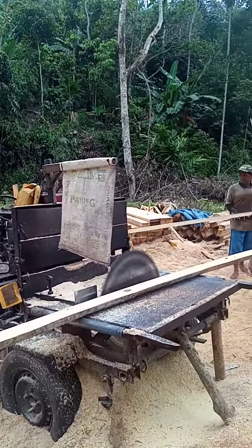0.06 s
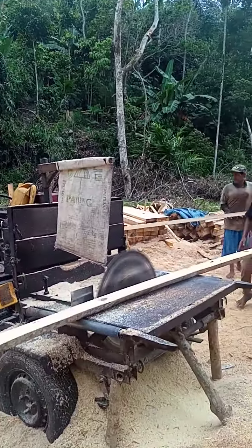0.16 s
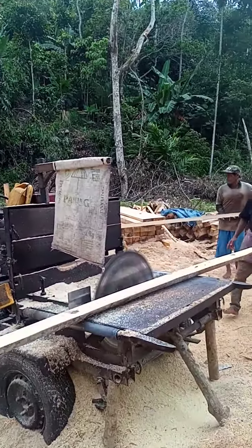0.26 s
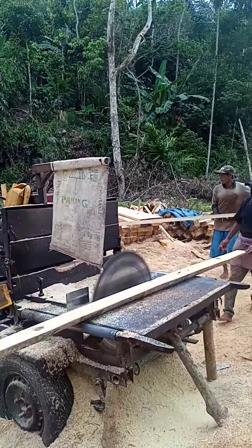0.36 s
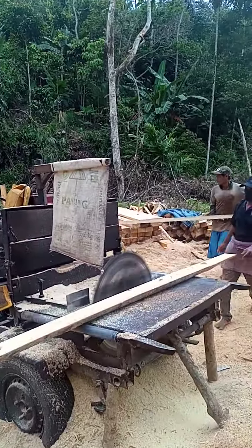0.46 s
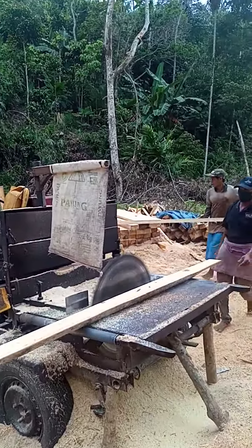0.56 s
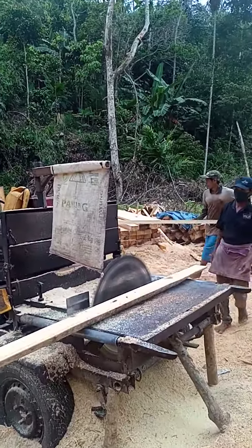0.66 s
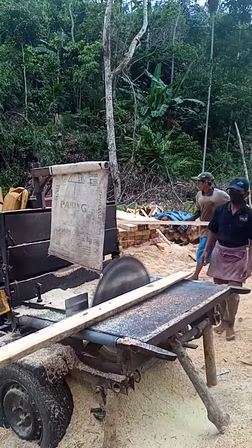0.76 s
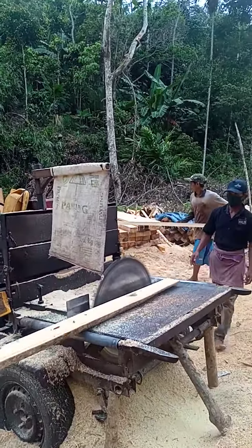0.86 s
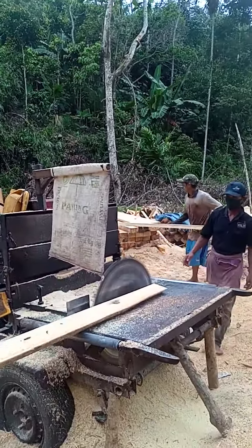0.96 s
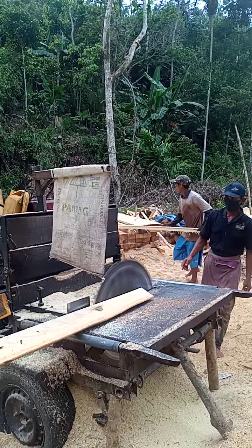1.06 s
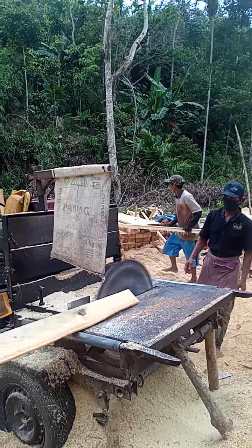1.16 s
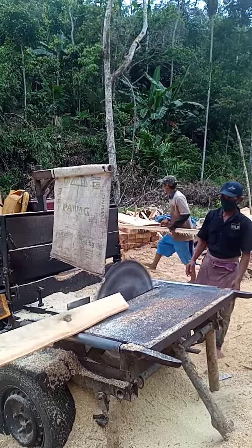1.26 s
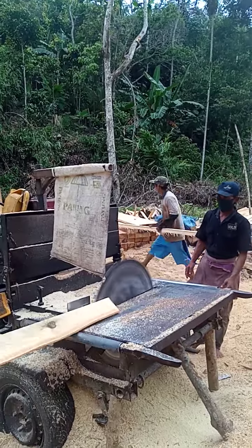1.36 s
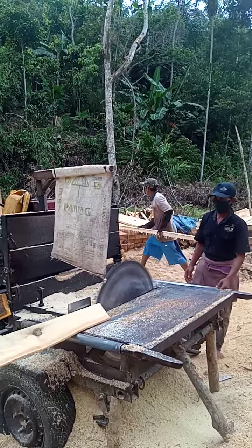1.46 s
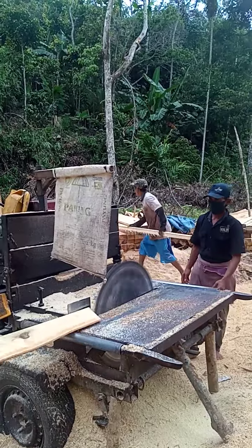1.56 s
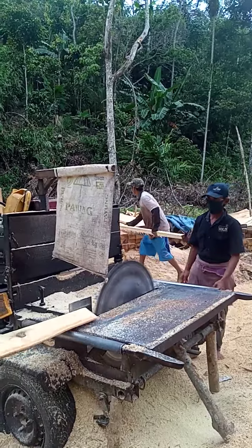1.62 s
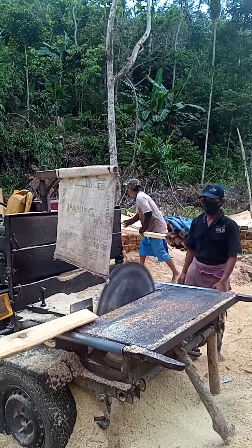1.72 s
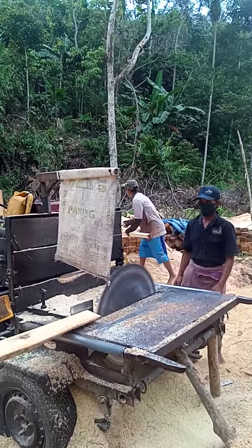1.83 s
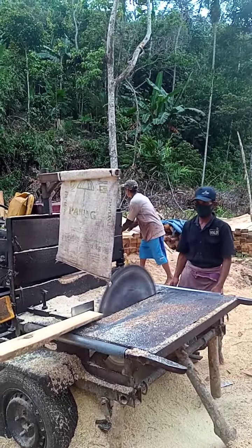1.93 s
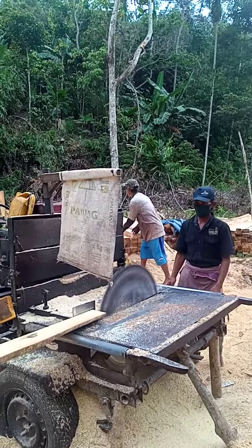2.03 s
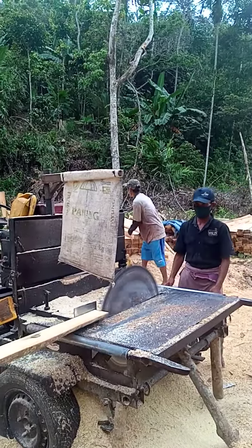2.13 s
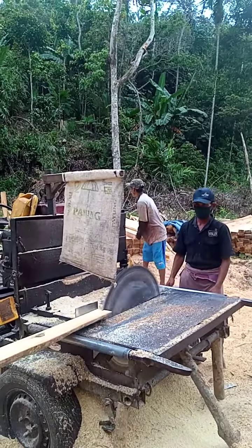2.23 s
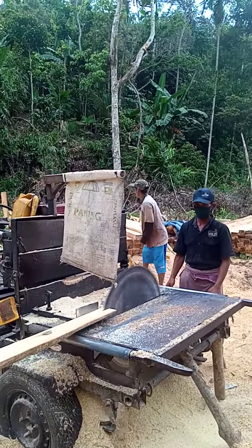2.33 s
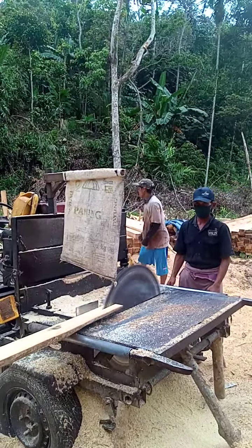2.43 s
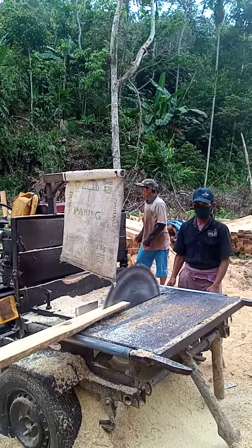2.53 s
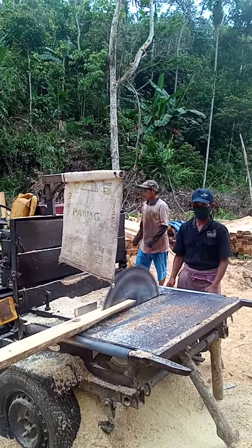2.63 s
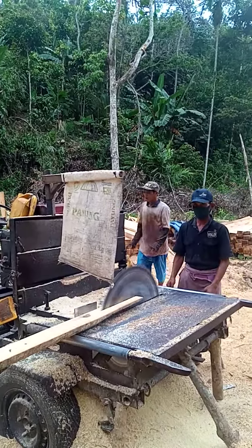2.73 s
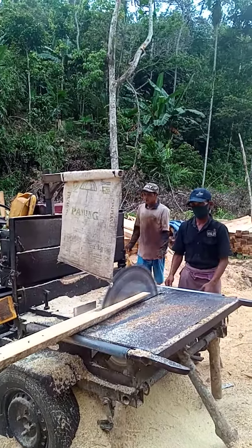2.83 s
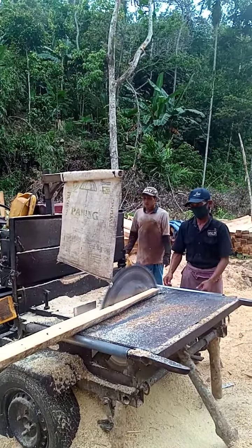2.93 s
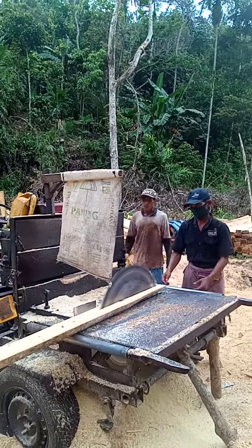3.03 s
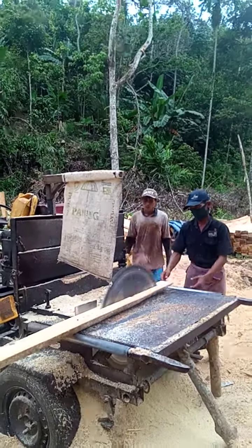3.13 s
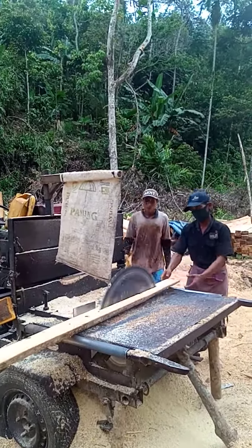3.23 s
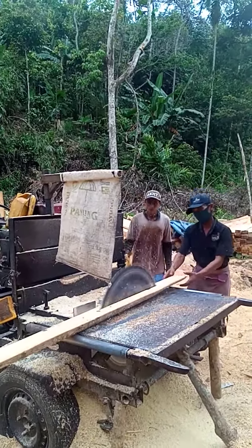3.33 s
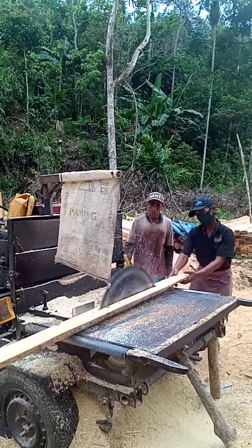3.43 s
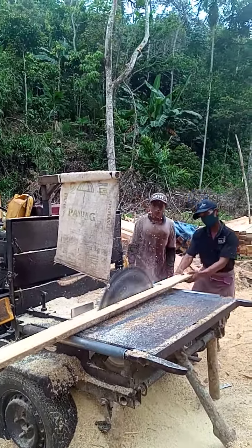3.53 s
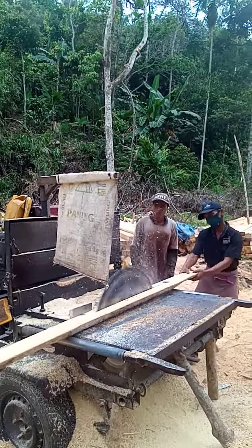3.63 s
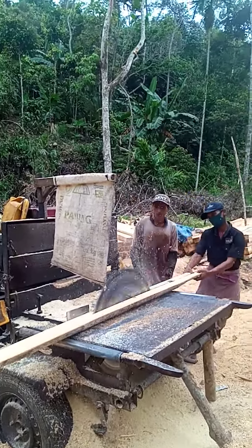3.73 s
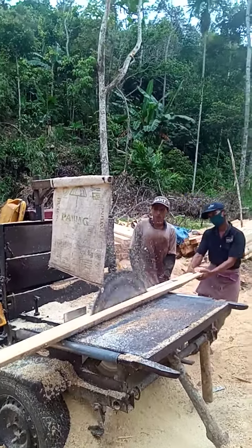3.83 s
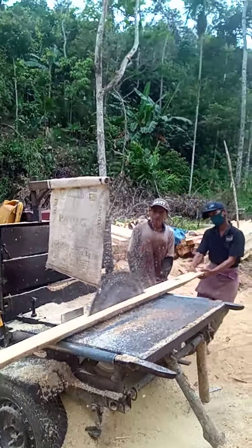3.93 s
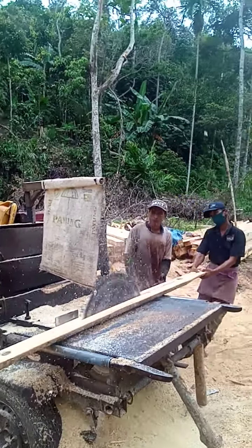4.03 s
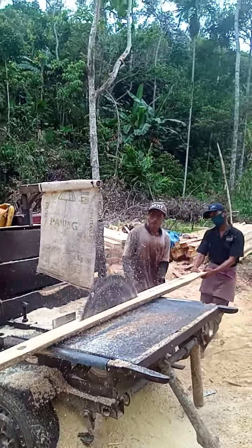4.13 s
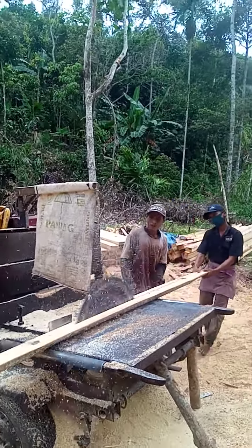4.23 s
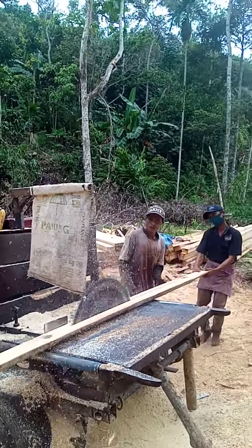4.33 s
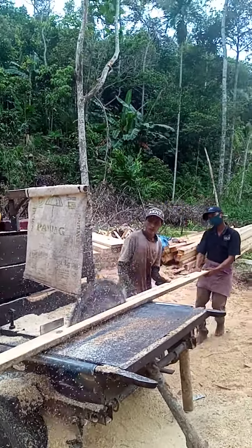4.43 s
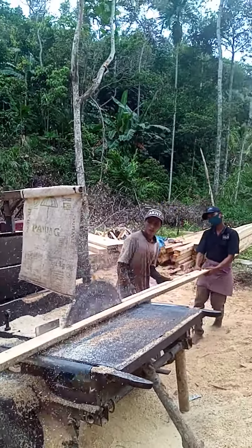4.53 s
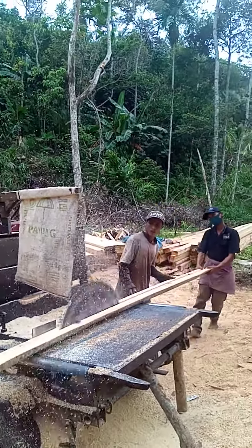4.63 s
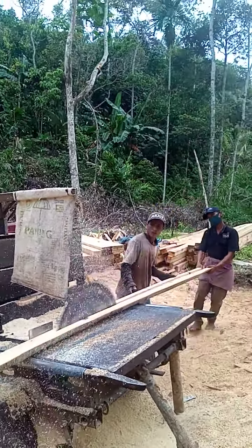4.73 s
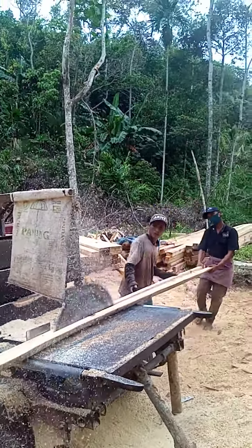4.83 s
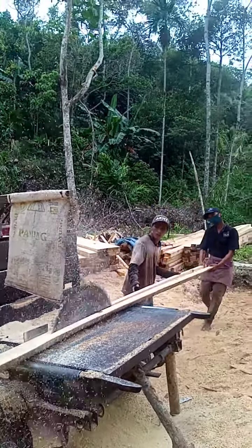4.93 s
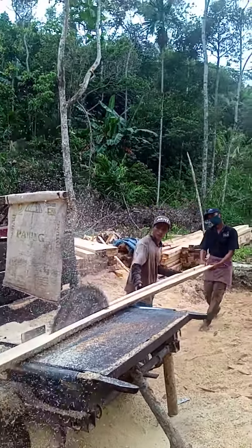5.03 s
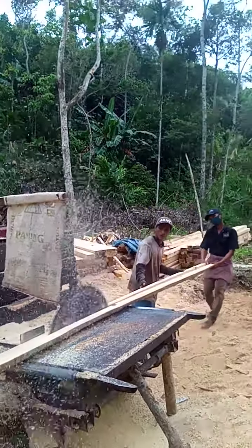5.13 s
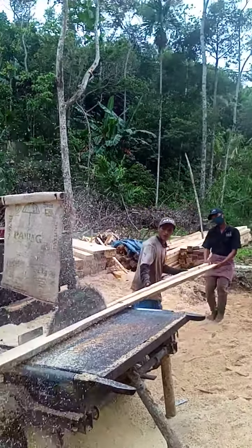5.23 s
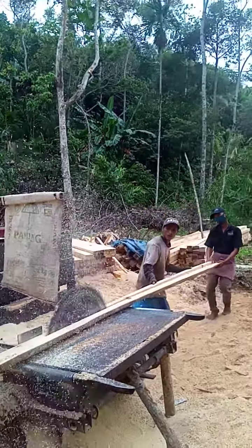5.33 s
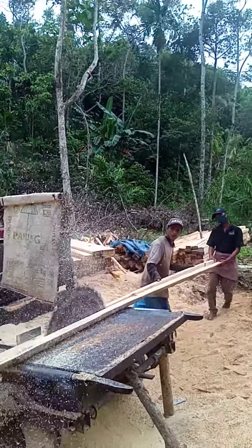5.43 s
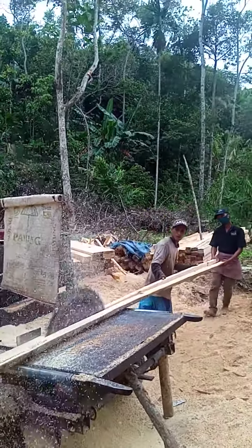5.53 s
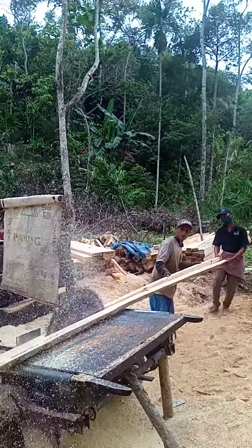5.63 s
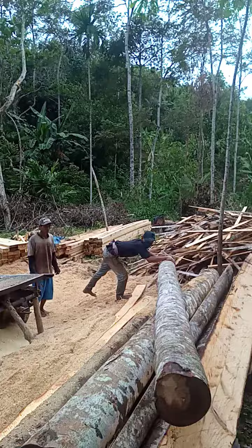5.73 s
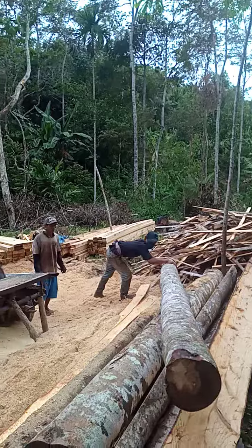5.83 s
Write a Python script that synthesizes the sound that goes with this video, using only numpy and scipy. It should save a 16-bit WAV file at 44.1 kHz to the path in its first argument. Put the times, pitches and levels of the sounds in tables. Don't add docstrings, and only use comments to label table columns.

```python
import sys
import numpy as np
from scipy import signal
from scipy.fft import rfft, irfft
from scipy.io import wavfile
from scipy.ndimage import uniform_filter1d, minimum_filter1d

SR = 44100
rng = np.random.default_rng(int(sys.argv[2]) if len(sys.argv) > 2 else 0)


def materialize(psi):
    bounded = np.clip(np.atleast_2d(psi).T, -1, 1)
    quanta = np.round(bounded * 32767).astype(np.int16)
    wavfile.write(sys.argv[1], SR, quanta)


def magnitude_from_level(level_db):
    exponent = np.asarray(level_db, float) / 20
    return 10 ** exponent


N = 258855

DROPOUT_S, RETURN_S = 5.531, 5.644
FAR_S = 5.685
IDLE_HZ = 12.95


def colour(x, points):
    hz, db = np.transpose(points)
    f = np.maximum(np.fft.rfftfreq(N, 1 / SR), 1)
    gain_db = np.interp(np.log(f), np.log(hz), db, left=-90, right=-90)
    y = irfft(rfft(x) * magnitude_from_level(gain_db), N)
    return y / y.std()


def walk(rate):
    k = int(SR / rate)
    held = np.repeat(rng.standard_normal(N // k + 1), k)
    return 1.1 * uniform_filter1d(uniform_filter1d(held, k), k)[:N]


def curves(rows):
    s, *columns = np.transpose(rows)
    return [np.interp(np.arange(N) / SR, s, c) for c in columns]


def bumps(rows):
    s, half_s, *db = np.transpose(rows)
    t = np.arange(0, N + 64, 64) / SR
    humps = np.exp(-((t - s[:, None]) / half_s[:, None]) ** 2)
    return [np.interp(np.arange(N) / SR, t, d @ humps) for d in db]


def add(out, s, sound):
    i = int(s * SR)
    if 0 <= i < N:
        out[i:i + len(sound)] += sound[:N - i]


def burst(hz, length_s, glide=0., lean=0.79):
    u = np.linspace(0, 1, int(length_s * SR))
    hump = np.sin(np.pi * u ** lean) ** 2
    turns = hz * length_s * (u - .5) * (1 + glide * (.5 - u))
    return hump * np.sin(2 * np.pi * turns)


def ticks(spread_db, size):
    loud = np.minimum(rng.exponential(size=N // size + 1), 4)
    grains = uniform_filter1d(loud.repeat(size)[:N], size // 2)
    return rng.standard_normal(N) * magnitude_from_level(spread_db * grains)


def forest(far):
    # f/Hz, level/dB
    leaf_tone = [(300, -11), (1000, -7), (3000, 7), (4200, 11), (6000, -13), (10000, -10), (15500, -24)]
    # f/Hz, level/dB
    insect_tone = [(10500, -20), (12500, 1), (15800, 1)]
    leaves = magnitude_from_level(-73) * colour(rng.standard_normal(N), leaf_tone)
    insects = magnitude_from_level(-86 - 6 * far) * colour(rng.standard_normal(N), insect_tone)
    return leaves + insects


def wind(level_db):
    # f/Hz, level/dB
    wind_tone = [(20, -34), (40, -4.5), (70, 0.5), (110, -1), (170, -14.5), (260, -5), (400, -11),
                 (700, -28)]
    gusty = rng.standard_normal(N) * magnitude_from_level(2.1 * walk(14))
    return colour(gusty, wind_tone) * magnitude_from_level(level_db)


def thumps():
    # t/s of the peak, peak level/dB, f/Hz, turns
    blows = [(0.077, -46, 112, 2), (0.237, -27.5, 99, 1.9), (0.532, -32.5, 93.6, 2.2),
             (.774, -44, 122, 2.7), (0.791, -39.5, 80.5, 2), (.972, -41.5, 120, 2), (2.545, -38, 90, 1.25),
             (3.8, -44, 100, 2.4), (3.822, -43, 60, 2), (3.856, -32.5, 102, 1.4), (3.93, -43, 100, 2),
             (3.97, -42, 190, 2.3), (4.009, -35, 233, 1.9), (4.038, -41, 89, 2.9), (4.064, -29.5, 124, 1.5),
             (4.394, -47, 90, 1.7), (4.42, -49, 95, 1.5), (4.5, -37.5, 102, 1.6), (4.523, -34.5, 230, 0.92),
             (4.748, -39, 120, 2.3), (4.875, -44, 65, 1.9), (5.055, -28, 121, 1.1), (5.132, -38.5, 74, 1.8),
             (5.174, -38.5, 100, 1.8), (5.197, -43, 90, 1.8), (5.41, -40, 95, 2.2), (5.43, -39, 85, 2.8),
             (5.452, -35, 94.5, 0.92), (5.689, -45, 99, 1.9)]
    out = np.zeros(N)
    for s, db, hz, turns in blows:
        length_s = (turns + 1) / hz
        add(out, s - length_s / 3, magnitude_from_level(db) * burst(hz, length_s, glide=.4, lean=.58))
    return out


def clatter(phase):
    # f/Hz, level/dB
    tin_tone = [(240, -35), (400, -16.5), (900, -12.5), (1190, -8.5), (1470, -16), (1650, -7), (2250, -5.5),
                (2500, 0), (2780, 2.5), (3100, -23.5), (3620, -27.5), (5000, -50)]
    # f/Hz, level/dB
    valve_tone = [(3300, -17), (3700, -1), (4900, -26), (5700, 0), (6500, -14), (6800, -11), (8500, -7),
                  (10000, 4.5), (11000, -8.5), (12500, -24), (15600, -29)]
    swell_db = np.exp(-((phase % 1 - .52) / 0.1) ** 2) + 0.24 * np.cos(4 * np.pi * phase)
    tin = colour(ticks(1.95, size=120) * magnitude_from_level(2.4 * swell_db + 0.61 * walk(40)), tin_tone)
    valves = colour(ticks(1.6, size=100) * magnitude_from_level(5.1 * swell_db + 2.4 * walk(27)), valve_tone)
    return tin + magnitude_from_level(-20.5) * valves


def engine(firings, period):
    # place in cycle 0-1, f/Hz, rise/s, t60/s, level/dB, level scatter/dB
    knocks = [(0.7, 2040, 0.00072, 0.0091, -33.5, 4.5), (0.2, 1300, .001, 0.019, -51, 4.5),
              (.46, 726, 0.023, 0.12, -39.5, 0.5), (0.4, 755, 0.0049, 0.05, -41, -3),
              (0.84, 1100, 0.0071, 0.038, -67, 11), (.62, 289, 0.0019, 0.034, -47, 1),
              (0.3, 140, 0.012, 0.028, -50, -4)]
    pop_hz, pop_s, pop_db = 284, .0145, -38.5
    wall_s, wall_db = .0228, -4
    load_lag = 0.0887
    exhaust, casing, t = np.zeros(N), np.zeros(N), np.arange(SR // 8) / SR
    chance = rng.standard_normal((len(firings), 3 + 2 * len(knocks)))
    for s, p, c in zip(firings, period, chance):
        hz = pop_hz * (1 + 0.0036 * c[0])
        pop = burst(hz, pop_s, glide=0.033, lean=0.9)
        echo = burst(0.92 * hz, 1.075 * pop_s, glide=0.042, lean=0.83)
        start_s = s - pop_s / 2
        add(exhaust, start_s, pop * magnitude_from_level(pop_db + 0.84 * c[1]))
        add(exhaust, start_s + wall_s, -echo * magnitude_from_level(pop_db + wall_db + 0.72 * c[2]))
        late = load_lag * (IDLE_HZ - 1 / p)
        for (place, hz, rise, t60, db, scatter_db), a, b in zip(knocks, c[3::2], c[4::2]):
            envelope = (1 - np.exp(-t / rise)) * magnitude_from_level(-60 * t / t60)
            ring = envelope * np.sin(2 * np.pi * hz * (1 + 0.0045 * b) * t)
            add(casing, s + (place + late + 0.01157 * b) * p, ring * magnitude_from_level(db + scatter_db * a))
    return exhaust, casing


def feed():
    # t/s, blade howl level/dB
    bite_track = [(1.86, -45), (2.05, -40.5), (2.4, -39), (2.62, -37), (2.78, -34.5), (3.06, -35),
                  (3.65, -31.5), (4.5, -31), (5.68, -32)]
    # t/s, half length/s, howl rise/dB, hiss rise/dB
    grazes = [(.55, 0.22, 1.5, 6), (.545, 0.014, 6, -2), (.76, .02, -3, 4.5), (1.3, .04, 1.5, 9),
              (1.34, 0.024, 6, 11), (1.39, 0.063, 5.5, 0), (1.43, 0.03, 1, 13), (1.69, .025, -2, 4),
              (1.82, .015, -18, -2)]
    # t/s, half length/s, howl rise/dB
    knots = [(2.2, .06, -1), (2.32, 0.042, 2.5), (2.43, 0.012, 4.5), (2.455, .012, -1), (2.48, .012, 1.5),
             (2.52, .02, -1), (2.575, .015, 0.5), (2.78, .04, 1.5), (3.735, 0.018, 1.5),
             (3.755, 0.013, -0.5), (3.785, .012, 2), (4.23, .015, 1), (4.4, 0.0065, -3.5),
             (4.425, 0.019, 2), (4.51, 0.011, -2.5), (5.36, 0.036, -1.5), (5.4, .015, 3.5),
             (5.661, 0.0042, -8), (5.67, 0.0044, 6.5)]
    free_howl_db, free_hiss_db = -49.5, -70
    full_howl_db, full_hiss_db = -30.5, -41.5
    entry_s, entry_rise_s = 1.842, 0.033
    dust_top_s, dust_hold_s, dust_fade_db_s = 2.2, 0.8, 4
    t = np.arange(N) / SR
    inside = np.clip((t - entry_s) / entry_rise_s, 0, 1)
    bite_db, knot_db = curves(bite_track)[0], bumps(knots)[0]
    graze_howl_db, graze_hiss_db = bumps(grazes)
    scrap_db = -1.5 * (t > RETURN_S)
    cut_howl_db = bite_db + knot_db + scrap_db
    cut_hiss_db = full_hiss_db + 0.49 * (bite_db - full_howl_db) + 0.56 * knot_db
    howl_db = (1 - inside) * (free_howl_db + graze_howl_db) + inside * cut_howl_db
    hiss_db = (1 - inside) * (free_hiss_db + graze_hiss_db) + inside * cut_hiss_db
    thrown_db = np.interp(t, [entry_s, dust_top_s], [-2, 5])
    settled_db = dust_fade_db_s * np.clip(t - dust_top_s - dust_hold_s, 0, 1.6)
    dust_db = np.where(t < entry_s, -0.5, thrown_db - settled_db)
    return howl_db, hiss_db, dust_db


def saw(speed, howl_db, hiss_db, dust_db):
    # f/Hz, level/dB
    howl_tone = [(240, -49), (400, -27), (500, -22), (606, -29.5), (881, -23), (1040, -22.5), (1390, -29.5),
                 (2190, -10), (2600, 1), (3220, -6), (3710, -30), (4500, -30), (5850, -73)]
    # f/Hz, level/dB
    hiss_tone = [(3000, -46), (3980, -10), (4540, -30), (5100, -4.5), (6000, 2), (6450, 1.5), (6850, -11.5),
                 (7200, -10), (9280, -5), (10300, 1.5), (11000, -5), (12900, -30.5), (15000, -30),
                 (15700, -33)]
    # f/Hz, width/Hz, level/dB
    plate = [(1060, 33, -26.5), (1217, 44, -29.5), (1506, 44, -25.5), (1789, 27, -20.5), (2017, 41, -17.5),
             (2346, 41, -14.5), (2494, 32, -13), (2583, 20.5, -7), (2730, 42, -8), (2878, 52, -11.5),
             (3092, 27, -15.5), (3970, 27, -31.5), (4820, 63, -26), (5260, 31, -29), (5620, 49, -20.5),
             (5840, 12, -34), (6085, 46, -17.5), (6580, 68, -36.5), (6990, 40, -28), (7440, 77, -23.5),
             (7570, 20, -32), (8270, 40, -24), (8500, 35, -37), (8820, 38, -27.5), (9130, 76, -27.5),
             (10230, 52, -25)]
    teeth_per_cycle = 40.8
    tooth = np.cumsum(teeth_per_cycle * speed * (1 + .024 * walk(25))) / SR
    strikes = np.diff(np.floor(tooth), prepend=0) * magnitude_from_level(5.8 * rng.standard_normal(N))
    grain = magnitude_from_level(0.41 * walk(45))
    bite = (strikes / strikes.std() + 2.13 * rng.standard_normal(N)) * grain
    out = magnitude_from_level(howl_db - 2.0) * colour(bite, howl_tone)
    graze = ticks(3.2, size=90)
    light = np.clip((-53.5 - hiss_db) / 8, 0, 1)
    rub = light * graze / graze.std() + np.sqrt(1 - light ** 2) * rng.standard_normal(N)
    hiss = colour(rub * grain * magnitude_from_level(0.76 * walk(24.66)), hiss_tone)
    dust_band = signal.butter(3, [11300, 13600], "band", fs=SR, output="sos")
    dust = signal.sosfiltfilt(dust_band, hiss)
    out += magnitude_from_level(hiss_db) * (hiss + (magnitude_from_level(dust_db) - 1) * dust)
    low_db = howl_db + 0.36 * (howl_db + 29.5)
    high_db = hiss_db + 8.5
    for hz, width, db in plate:
        ring = signal.lfilter(*signal.iirpeak(hz, hz / width, SR), rng.standard_normal(N) * grain)
        out += magnitude_from_level(db + (low_db if hz < 5000 else high_db)) * ring / ring.std()
    return out


def scene():
    # t/s, rate/Hz (cycles a second)
    speed_track = [(0.0, 12.924), (0.7, 12.945), (1.4, 12.977), (1.9, 12.949), (2.2, 12.976), (2.5, 12.581),
                   (2.8, 12.389), (3.3, 12.445), (4.0, 12.369), (4.7, 12.302), (5.53, 12.155)]
    late_firings = [5.612, 5.667, 5.745, 5.822]
    # t/s, level/dB
    gusts = [(0, -54.5), (2.4, -55), (3, -57), (3.9, -50), (4.3, -52), (4.8, -51), (5.2, -52.5),
             (5.68, -51.5)]
    # exhaust, casing, clatter, wind, howl, hiss level/dB
    far_start_db = [-13.5, -11.5, -59.5, -56.5, -64.5, -88]
    far_slope_db = [20, 34, 20, -28, 9, 57]
    t = np.arange(N) / SR
    far = t > FAR_S
    speed, = curves(speed_track)
    phase = -.3204 + np.cumsum(speed) / SR
    cycles = np.arange(int(phase[int(DROPOUT_S * SR)]) + 1)
    firings = np.append(np.interp(cycles, phase, t), late_firings)
    phase = np.where(far, (t - late_firings[1]) * IDLE_HZ, phase)
    firing_hz = np.where(firings > RETURN_S, IDLE_HZ, speed[(firings * SR).astype(int)])

    load = IDLE_HZ - speed
    howl_db, hiss_db, dust_db = feed()
    close_db = [-3 * load, 4.5 * load, np.full(N, -46.), curves(gusts)[0], howl_db, hiss_db]
    far_db = np.array(far_start_db)[:, None] + np.outer(far_slope_db, t - FAR_S)
    exhaust_db, casing_db, clatter_db, wind_db, howl_db, hiss_db = np.where(far, far_db, close_db)

    exhaust, casing = engine(firings, 1 / firing_hz)
    casing = np.where(far, np.roll(casing, int(0.00493 * SR)), casing)
    motor = magnitude_from_level(exhaust_db) * exhaust + magnitude_from_level(casing_db) * casing + magnitude_from_level(clatter_db) * clatter(phase)
    blade = saw(speed, howl_db, hiss_db, dust_db)
    return (forest(far) + wind(wind_db) + thumps() + motor + blade)[None]


def roll_off(x):
    return signal.sosfilt(signal.butter(12, 16030, fs=SR, output="sos"), x)


def record(dry):
    limit = .13
    t = np.arange(N) / SR
    room_left = minimum_filter1d(np.minimum(1, limit / (abs(dry) + 1e-9)), size=129)
    held = dry * uniform_filter1d(room_left, size=129)
    gate = np.clip((DROPOUT_S - t) / 0.0012, 0, 1) + np.clip((t - RETURN_S) / 0.0014, 0, 1)
    top = signal.ellip(10, .1, 70, 15780, fs=SR, output="sos")
    return roll_off(signal.sosfiltfilt(top, held * gate))


dry = scene()
out = record(dry)
materialize(out)
```